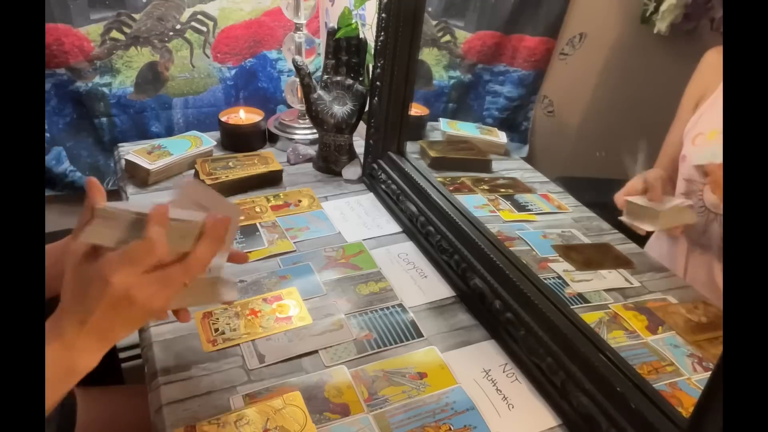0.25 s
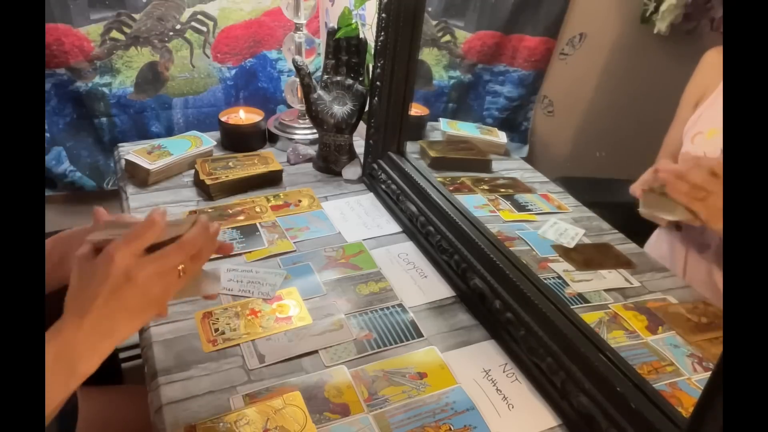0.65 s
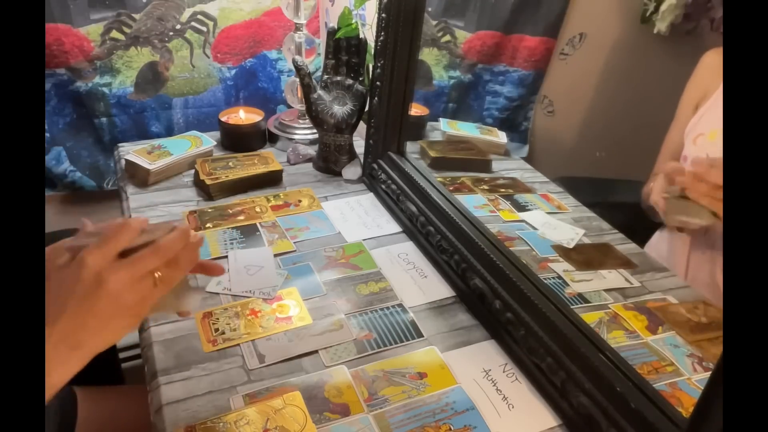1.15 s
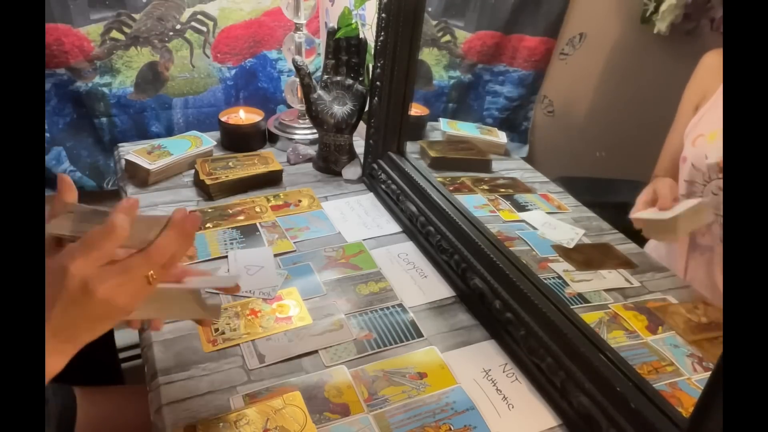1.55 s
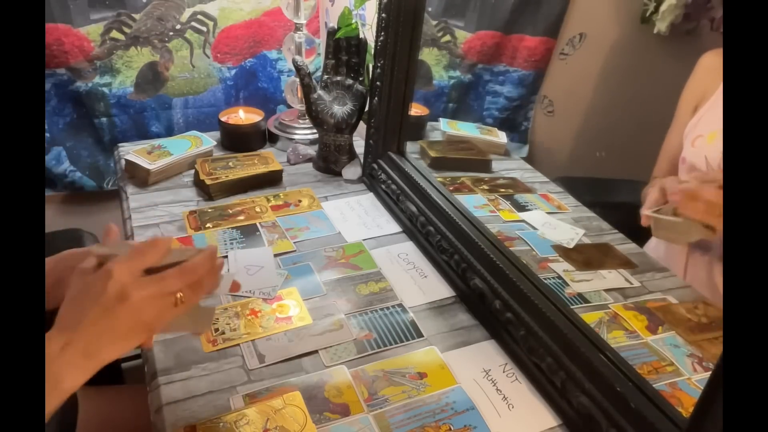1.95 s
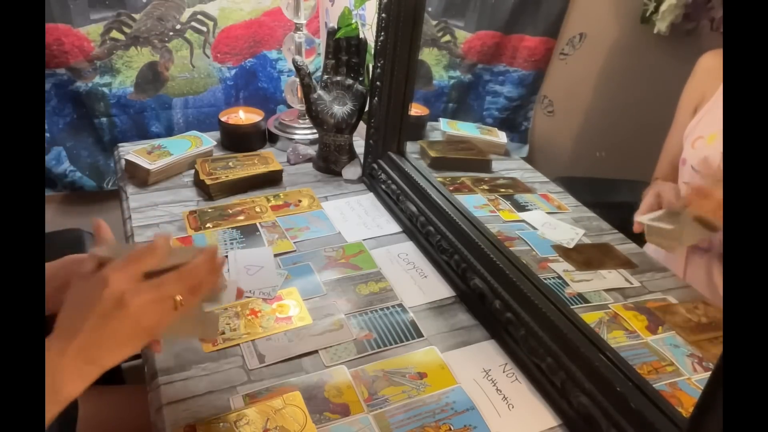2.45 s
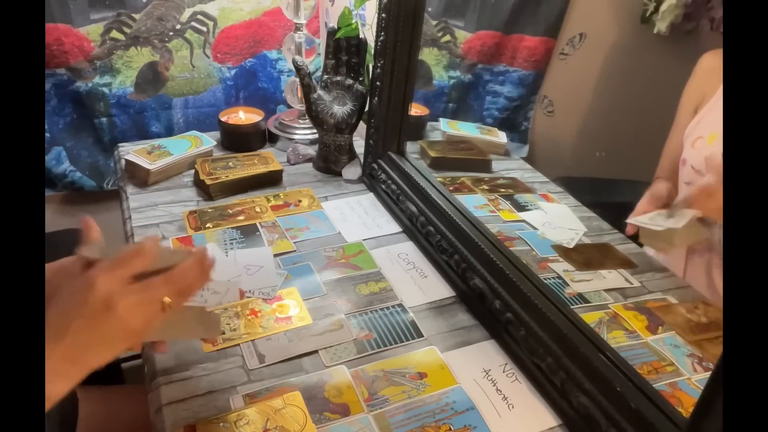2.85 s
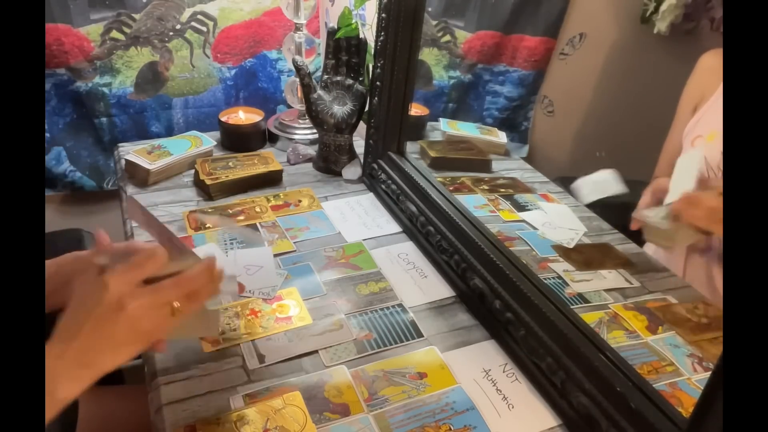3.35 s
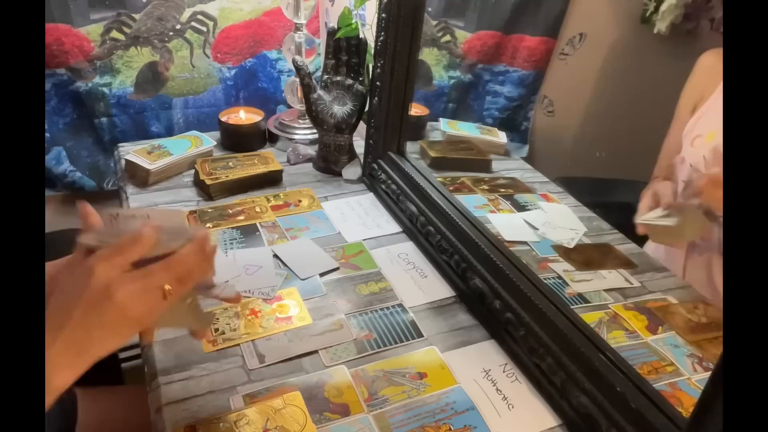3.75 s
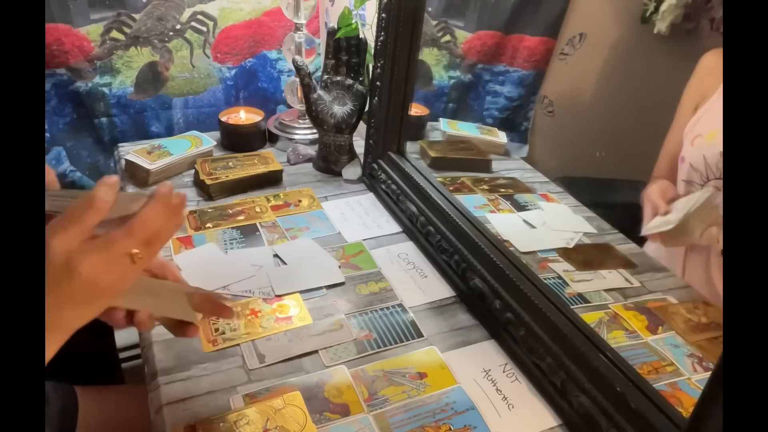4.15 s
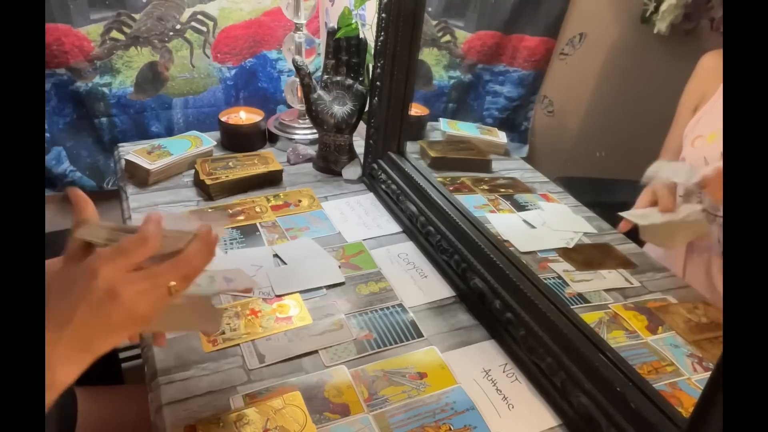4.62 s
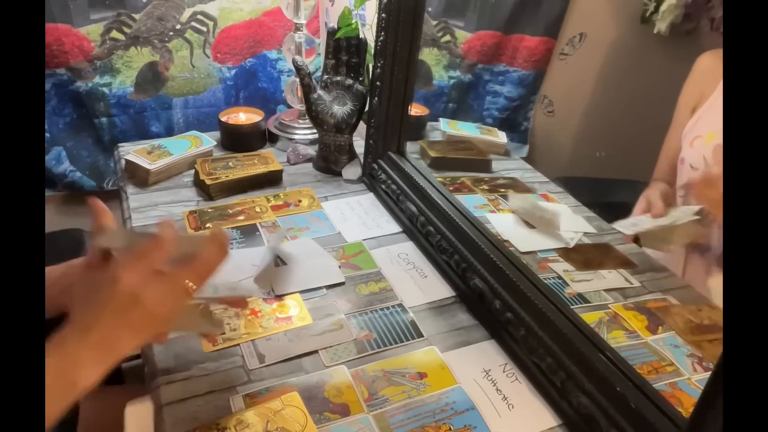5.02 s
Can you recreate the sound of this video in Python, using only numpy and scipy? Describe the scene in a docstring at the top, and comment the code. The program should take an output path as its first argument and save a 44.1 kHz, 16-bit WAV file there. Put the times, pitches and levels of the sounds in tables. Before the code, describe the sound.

Close stereo microphones in a small, quiet room pick up a deck of stiff cards being shuffled overhand. Each quick stroke is a soft finger tap, a gritty swelling hiss and a slap with a low puff of air. Single edges click between. Late on the slaps thin out, then resume, and the deck thuds softly into the palm.

```python
"""In a small room, above a table, a pair of nearby microphones hears stiff cards shuffled overhand.
Four to five strokes a second: a finger taps and lifts a packet, which opens a gap with a falling note,
its faces slide with a gritty hiss, and most strokes end in a slap onto the deck with a low puff of air.
Single edges flick past the fingers, and late on the slaps pause briefly. At the end the deck lands softly
in the palm, with a falling note of trapped air and a low ring. Very quiet room air lies under it all."""
import sys
import numpy as np
from scipy import signal
from scipy.fft import rfft, irfft, next_fast_len
from scipy.io import wavfile

SR = 44100
rng = np.random.default_rng(int(sys.argv[2]) if len(sys.argv) > 2 else 0)


def store_pcm(level_fs):
    """Save levels as 16-bit WAV."""
    pcm = np.round(np.clip(level_fs, -1, 1) * 32767).astype(np.int16)
    wavfile.write(sys.argv[1], SR, np.atleast_2d(pcm).T)


N = 232888
PRE = 4410  # samples of lead-in, cut off at the end of scene()
TIME = np.arange(-PRE, N) / SR  # seconds


def undb(db):
    """Decibels to gain."""
    return 10 ** (np.asarray(db) / 20)


def unit(x):
    """Scale to rms 1."""
    return x / np.sqrt(np.mean(x ** 2))


def blow(x):
    """Scale a short sound to the energy of 10 ms at rms 1."""
    return x * np.sqrt(.01 * SR / np.sum(x ** 2))


def along(hz, table, axis=1):
    """Read a column of a table on a log-frequency axis."""
    table = np.array(table, float)
    return np.interp(np.log(hz + 1), np.log(table[:, 0]), table[:, axis])


def colour(x, table):
    """Minimum-phase filter with the outline of a table of Hz and dB, built by folding the cepstrum."""
    n = 2 * next_fast_len(x.shape[-1] // 2 + 512)
    outline = undb(along(np.fft.rfftfreq(n, 1 / SR), table))
    cepstrum = irfft(np.log(outline))
    cepstrum[1:n // 2] *= 2
    cepstrum[n // 2 + 1:] = 0
    response = np.exp(rfft(cepstrum))
    return irfft(rfft(x, n) * response)[..., :x.shape[-1]]


def add(track, s, x):
    """Mix a sound into a track at time s in seconds."""
    i = max(0, int(s * SR) + PRE)
    x = x[..., :track.shape[-1] - i]
    track[..., i:i + x.shape[-1]] += x


def grit(n, spread_db):
    """Dense tiny collisions whose size changes at random every 8 samples."""
    sizes_db = spread_db * np.repeat(rng.standard_normal(n // 8 + 1), 8)[:n]
    return unit(rng.standard_normal(n) * undb(sizes_db))


def walk(n, rate):
    """Random wander with spread near 1, straight between knots that come at this rate per second."""
    knots = rng.standard_normal(1024)
    return np.interp(np.arange(n) / SR * rate, np.arange(len(knots)), knots)


# Edges of the body, middle, snap and fizz bands [Hz].
BAND_EDGES = np.array([250, 700, 2200, 6000, 14000])


def bands(x, band_db, bass_db):
    """Give white sound of level 0 dB these levels in the four bands; bass_db is the slope from body to bass."""
    density_db = np.array(band_db) - 10 * np.log10(np.diff(BAND_EDGES) / (SR / 2))
    centres = np.sqrt(BAND_EDGES[1:] * BAND_EDGES[:-1])
    bass = (140, density_db[0] + bass_db)
    return colour(x, np.vstack([bass, np.c_[centres, density_db]]))


# The still air of the room. Each row: frequency [Hz], relative density [dB per Hz].
STILL_AIR = [(30, -7.5), (120, -10.5), (300, -13.5), (1000, -21.5), (4000, -21), (14000, -30.5)]
QUIET_DB = -76.5  # level of the still air


def still_air():
    """Steady coloured noise, independent at the two microphones."""
    sides = [unit(colour(rng.standard_normal(len(TIME)), STILL_AIR)) for _ in range(2)]
    return undb(QUIET_DB) * np.array(sides)


# The two microphones. Each row: frequency [Hz], left minus right [dB], right later by [ms].
MICROPHONES = [(100, 1.5, .06), (400, 5, 0.029), (970, 7.5, 0.085), (1290, 2, 0.045), (2700, -5, 0.19),
               (3800, -4, 0.19), (5770, 5, 0.28), (7790, -1, 0.23), (11800, 0, 0.1638)]


def microphones(n):
    """Left and right response to the hands: the casing delays and shades each side differently."""
    hz = np.fft.rfftfreq(n, 1 / SR)
    balance_db, lag_s = along(hz, MICROPHONES), along(hz, MICROPHONES, axis=2) / 1000
    return np.array([undb(balance_db / 2), undb(-balance_db / 2) * np.exp(-2j * np.pi * hz * lag_s)])


# The room's echo. Each row: frequency [Hz], level [dB], likeness of left and right [0-1].
ROOM_ECHO = [(131, 2.5, 0.99), (310, -5.5, 0.94), (810, -1, 0.22), (1600, -5, 0.47), (4150, -3, 0.05),
             (8650, -5, 0.2), (12500, -9, 1)]
# The room's strongest standing wave: frequency [Hz], level [dB], T60 [s].
STANDING_WAVE = (130, -30, 0.32)
ROOM_T60_S = 0.26  # of the reflections


def echo(build_s, spread_db, size=15000):
    """The room's answer from one hand position: uneven reflections that fade fast, and a standing wave."""
    t, hz = np.arange(size) / SR, np.fft.rfftfreq(size, 1 / SR)
    fade = undb(-60 * t / ROOM_T60_S) * (1 - np.exp(-(t / build_s) ** 2))
    shared, *own = (rfft(grit(size, spread_db) * fade) / np.linalg.norm(fade) for _ in range(3))
    like = np.clip(along(hz, ROOM_ECHO, axis=2), 0, 1)
    mix = np.sqrt(like) * shared + np.sqrt(1 - like) * np.array(own)
    field = mix * undb(along(hz, ROOM_ECHO))
    reflections = irfft(field * microphones(size)) * (1 - (t / t[-1]) ** 2)  # tapers to silence
    mode_hz, mode_db, mode_t60 = STANDING_WAVE
    standing = np.sin(2 * np.pi * mode_hz * t) * undb(-60 * t / mode_t60)
    return reflections + undb(mode_db) * standing / np.linalg.norm(standing)


def room(x, size=4410):
    """Hands and cards keep moving, so each overlapping stretch meets a fresh pattern of reflections."""
    out, window = np.zeros((2, len(x))), signal.windows.cosine(2 * size)
    for i in range(0, len(x), size):
        piece = x[i:i + 2 * size]
        faded = piece * window[:len(piece)]
        add(out, TIME[i], signal.fftconvolve([faded], echo(build_s=0.0037, spread_db=4), axes=1))
    return out


# Colour of card stock. Each row: frequency [Hz], gain [dB].
CARD_COLOUR = [(40, -18.5), (130, -5.5), (280, -1), (520, -7.5), (1000, -4), (1400, -1.5), (1800, -2.5),
               (2200, 1.5), (2700, 1), (4200, -0.5), (6000, -0.5), (8300, -4), (11500, -0.5), (13800, -2.5),
               (14900, -3), (16000, -22.5)]


def card_stock(x):
    """Stiff card gives every touch, rub and slap the same overall colour."""
    return colour(x, CARD_COLOUR)


# Air resonances between packets and cupped hands. Each row: frequency [Hz], width [Hz], strength [dB].
HAND_HOLLOWS = [(570, 130, 0), (1600, 373, -3)]


def cupped(x, shift, pitch=1, ring_db=0):
    """The hollow of the hands rings with each contact, a little differently as the grip changes."""
    out = x
    for hz, width_hz, db in HAND_HOLLOWS:
        centre = pitch * hz * np.exp(shift * rng.standard_normal())
        peak = signal.iirpeak(centre, hz / width_hz, fs=SR)
        out = out + undb(db + ring_db) * signal.lfilter(*peak, x)
    return out


def contact(rise_s, fall_s, flutter_db, flutter_s, spread_db, size=2600):
    """Card edges hit almost together, then flutter as they settle; rows are direct sound and room feed."""
    t = np.arange(size) / SR
    decay = np.exp(-t / fall_s) + undb(flutter_db) * np.exp(-t / flutter_s)
    direct = grit(size, spread_db) * (1 - np.exp(-t / rise_s)) * decay
    # summed over all directions the collisions have an even spectrum, so the room hears one plain click
    click = signal.unit_impulse(size, int(fall_s * SR))
    return np.array([blow(direct), blow(click)])


# Colours of a flick and of a lifting finger: body, middle, snap, fizz [dB].
FLICK_TONE, LIFT_TONE = [-7, -1.5, -4.5, -11], [-5.5, -2, -7, -9.5]


def tick(db, tone, brightness=0, rise_s=0.0016, fall_s=0.002):
    """One light contact of a fingertip or a card edge; brightness tilts it around the middle band."""
    hit = contact(rise_s, fall_s, flutter_db=-12, flutter_s=0.011, spread_db=7.0)
    band_db = db + np.array(tone) + brightness * (np.arange(len(tone)) - 1)
    gains = undb([0, -1.5])[:, None]  # direct, room feed
    return gains * cupped(bands(hit, band_db, bass_db=-3.5), shift=0.091, pitch=0.99, ring_db=2.5)


# The air gap's second note: ratio to the first, level [dB].
GAP_OVERTONE = (2.4, -4.1)


def gap_note(end_hz, fall_ratio, glide_s, ring_s, overtone_db=0, size=3000):
    """The air gap under a packet is a hollow whose rough note falls as the packet moves; a steady note joins."""
    t = np.arange(size) / SR
    turns = np.cumsum(end_hz * (1 + (fall_ratio - 1) * np.exp(-t / glide_s))) / SR
    swell = t * np.exp(-t / ring_s) * (1 + 1.5 * walk(size, rate=500))
    ratio, db = GAP_OVERTONE
    wavering = np.sin(2 * np.pi * ratio * end_hz * t + .5 * walk(size, rate=280))
    second = wavering * np.exp(-t / ring_s)  # with the swell below, it dies sooner
    return blow(np.sin(2 * np.pi * turns) * swell) + undb(db + overtone_db) * blow(second * swell)


def snags(n, per_s, db, fall_s):
    """Now and then a card edge catches and lets go: brief swells on top of even friction."""
    catches = (rng.random(n) < per_s / SR) * rng.exponential(size=n)
    return 1 + undb(db) * signal.lfilter([1], [1, -np.exp(-1 / (fall_s * SR))], catches)


# Strokes of the hand, each lifting a packet and drawing it over the deck; levels are before the card colour.
# Each row: lift [s], end of slide [s], lift level [dB], note the air gap falls to [Hz],
# slide level at its start [dB], swell of the slide, a fade where negative [dB].
HAND_STROKES = [(0.106, 0.198, -46, 396, -56.5, 15), (0.3, 0.327, -47.5, 545, -68.5, 2),
                (0.343, .447, -47, 315, -57.5, 17), (0.616, 0.724, -46.5, 373, -58.5, 21),
                (0.847, 0.966, -46.5, 450, -58.5, 26), (1.134, 1.252, -48.5, 460, -61, 21.5),
                (1.408, 1.484, -38.5, 425, -57, 30), (1.666, 1.76, -44, 508, -54.5, 9.5),
                (1.908, 2.008, -39.5, 487, -52, 11.5), (2.15, 2.24, -45, 430, -59.5, 17),
                (2.384, 2.479, -41, 357, -57.5, 22), (2.625, 2.73, -49.5, 430, -57.5, 4),
                (2.885, 2.953, -50.5, 545, -59, -12), (3.126, 3.244, -42.5, 524.6, -57.5, 17),
                (3.3478, 3.512, -42.5, 464, -62.5, 20), (3.597, 3.784, -44.5, 432, -64.5, 25.5),
                (3.864, 3.987, -50.5, 396, -66.5, 2), (4.033, 4.116, -52, 490, -62.5, -3.5),
                (4.281, 4.33, -57.5, 402, -67, 9), (4.33, 4.387, -74, 413, -53.5, 3),
                (4.508, 4.609, -48, 414, -53, 13.5), (4.864, 4.918, -67, 483, -63, -7.5),
                (4.925, 4.971, -43, 246, -76, 3), (4.987, 5.05, -48, 284, -68, -1),
                (5.149, 5.183, -73, 510, -81, 9)]
# Colours of sliding faces and of the dull drag under them: body, middle, snap, fizz [dB].
SLIDE_TONE, DRAG_TONE = [-16, -9, 0.5, 1], [-3, -4, -6.5, -19.5]
SWELL_POWER = 4.6  # the swell follows this power of the way covered
DRAG_DB, DRAG_SHARE = -61.5, .35  # reference level, and the share of the slide's level changes followed


def slides(grip_db, grain_db, release_s):
    """Card faces rub: a dull drag, and fine hiss that catches and slips, mostly swelling along the way."""
    out, t = np.zeros(len(TIME)), np.arange(SR // 3) / SR
    for start, end, _, _, slide_db, swell_db in HAND_STROKES:
        length = max(end - start, release_s)
        way = np.minimum(t / length / 0.99, 1)
        db = slide_db + swell_db * way ** SWELL_POWER + grip_db * walk(len(t), rate=110)
        gate = np.clip(np.minimum(t, length + release_s - t) / release_s, 0, 1)
        friction = unit(grit(len(t), grain_db) * snags(len(t), per_s=55, db=7, fall_s=0.00084))
        hiss = bands(friction, SLIDE_TONE, bass_db=1.5) * undb(db)
        drag_db = DRAG_DB + DRAG_SHARE * (db - DRAG_DB)
        drag = cupped(bands(friction, DRAG_TONE, bass_db=3.5), shift=0.14) * undb(drag_db)
        add(out, start, (hiss + drag) * gate)
    return out


NOTE_DB = 1  # gap note relative to the lift's level


def lifts():
    """Each stroke begins with a finger's soft tap and the note of the gap opening under the packet."""
    out = np.zeros((2, len(TIME)))
    for s, _, db, note_hz, *_ in HAND_STROKES:
        add(out, s - .0018, tick(db, LIFT_TONE, rise_s=.004, fall_s=0.0023))
        note = gap_note(note_hz, fall_ratio=1.4, glide_s=.011, ring_s=0.009)
        add(out, s, undb(db + NOTE_DB) * note)
    return out


# Single card edges flicking past a finger; levels are before the card colour.
# Each row: time [s], level [dB], brightness [dB per band].
EDGE_FLICKS = [(.1449, -47, -1), (.222, -38.5, -6), (.3746, -34.5, 1), (0.659, -47, -1), (0.8049, -41, 4),
               (.8695, -33, 1.5), (.879, -40.5, 0), (1.087, -60.5, 8.5), (1.1996, -47.5, 2.5),
               (1.3324, -39, 1.5), (1.6985, -47.5, 0), (2.408, -34.5, 2.5), (2.493, -34.5, 1.5),
               (2.636, -46, 6.5), (2.988, -54.5, 17), (3.1325, -41.5, -3), (3.17, -58, 9),
               (3.2399, -35, -8.5), (3.359, -35.5, 1.5), (3.3841, -39, 0), (3.4157, -32.5, 2),
               (3.4822, -42.5, 2.5), (3.652, -36.5, 3), (3.6766, -38.5, 4.5), (3.783, -35.5, -2),
               (3.9512, -48.5, -1.5), (4.078, -54.5, 5.5), (4.524, -43, 0), (4.699, -45.5, 1.5),
               (4.709, -41, -1.5), (4.8655, -42, 0.5), (4.927, -48.5, 7.5), (4.9885, -67, 12.5),
               (5.041, -76, 19.5), (5.093, -62.5, -7)]
STRAY_COUNT = 2  # stray ticks in each slide
STRAY_DB, STRAY_SPREAD_DB = -2, 5.5  # mean level relative to the slide's start, and its scatter


def touches():
    """Single edges flick past the fingers, and faint stray ones tick at random while a packet moves."""
    out = np.zeros((2, len(TIME)))
    for s, db, brightness in EDGE_FLICKS:
        add(out, s - .0008, tick(db, FLICK_TONE, brightness))
    for start, end, _, _, slide_db, _ in HAND_STROKES:
        for place, size in zip(rng.random(STRAY_COUNT), rng.standard_normal(STRAY_COUNT)):
            stray_db = slide_db + STRAY_DB + STRAY_SPREAD_DB * size
            add(out, start + place * (end - start), tick(stray_db, FLICK_TONE))
    return out


# The deck settling in the palm.
# Each row: time [s], level [dB], level of the trapped air [dB], note that air falls to [Hz].
PALM_LANDINGS = [(5.1931, -25.5, -38, 390)]
# What hand and deck ring with. Each row: frequency [Hz], relative level [dB], T60 [s].
HAND_AND_DECK_MODES = [(79.3, -14, 0.107), (128, 17.5, 0.07), (148, -8, 0.054), (192, -9, 0.092),
                       (284, -20, 0.16), (370, -16, 0.1), (458, -27, 0.13), (624, -5, .06)]
PALM_ROOM_DB = -20  # the palm thud's feed to the room


def palm(push_s, size=6000):
    """Trapped air escapes with a falling note; the soft palm pushes slowly, so low modes ring up gradually."""
    out, t = np.zeros(len(TIME)), np.arange(size) / SR
    ring = sum(undb(db - 60 * t / t60) * np.sin(2 * np.pi * hz * t) for hz, db, t60 in HAND_AND_DECK_MODES)
    push = 1 - np.exp(-(t / push_s) ** 2)
    for s, db, air_db, note_hz in PALM_LANDINGS:
        note = gap_note(note_hz, fall_ratio=1.62, glide_s=0.015, ring_s=0.007, overtone_db=-20)
        touch = tick(db - 27.5, LIFT_TONE, brightness=-2, rise_s=0.0037, fall_s=.006)[0]  # direct row only
        add(out, s - .009, undb(air_db) * note)
        add(out, s - .009, touch)
        add(out, s, undb(db) * blow(ring * push))
    return out


def puff(hz, width_s, size=1500):
    """Air squeezed from between two packets: a few low swings."""
    t = np.arange(size) / SR - 2 * width_s
    return blow(-np.cos(2 * np.pi * hz * t) * np.exp(-(t / width_s) ** 2))


# Packets and cards landing on the deck; levels are before the card colour.
# Each row: time [s], level [dB], air puff level [dB], snap and fizz relative to the level [dB],
# first contact earlier by [ms], pitch of the hands' hollow before its scatter [ratio].
LANDINGS = [(-.016, -31.5, -32.5, 5.5, -4.5, 1.04, 1.04), (0.207, -27, -36, -14, -13.5, 4.2, 1.17),
            (0.4504, -29.5, -26, 4.5, 1.5, 3.8, 0.56), (0.7293, -29, -32.5, -7, -18.5, 2.37, 0.89),
            (0.9591, -27.5, -27.5, 5, 1, 4.8, 0.86), (1.257, -32.5, -32, -3, -2.5, 2.78, 1.2),
            (1.363, -27, -32.5, 1, -5, 6, 0.99), (1.3807, -27, -49, 4, -0.5, 1.45, 0.71),
            (1.483, -23.5, -29.5, 1.5, -35, 7.26, 0.95), (1.7656, -29, -28.5, 3.5, -3.5, 3.9, 0.7),
            (2.0032, -26, -28.5, 6, -8.5, 5.43, 0.61), (2.2527, -23, -29.5, -6.5, -8, 4.85, 0.93),
            (2.4818, -29.5, -31.5, -2, 3, 3.9, 1.07), (2.745, -29.5, -34.5, 1.5, -4.5, 10.3, 0.74),
            (2.9099, -30.5, -51, 3, 6.5, .6, 0.82), (2.978, -26, -29, -2, 3.5, 4.5, .63),
            (3.519, -29, -46, 2, -4.5, 3.97, 0.67), (3.5253, -30.5, -49, 0.5, 4.5, 1.48, 0.57),
            (3.6406, -26, -66, -5.5, -15, 4.8, 0.88), (3.7768, -35, -40.5, 2.5, -4, 0.6, 1.34),
            (4.3893, -31.5, -28.5, 2, 5.5, 6, 0.57), (4.61, -30, -31.5, -5, -18, 3, 1.11),
            (4.7233, -21.5, -43, 3, -7, 4.18, 0.64)]
SLAP_BODY_DB, CORNER_DB, SLAP_ROOM_DB = -2.5, -5, -1.93  # body band, leading corner, feed to the room
PUFF_HZ, PUFF_SCATTER = 152, .12  # middle note of the puff, and its scatter as a share


def slaps():
    """A corner touches first and scrapes, then the packet lands flat and pushes out a puff of air."""
    out, gains = np.zeros((2, len(TIME))), undb([0, SLAP_ROOM_DB])[:, None]
    for s, db, puff_db, snap, fizz, lead_ms, pitch in LANDINGS:
        tone = db + np.array([SLAP_BODY_DB, 0, snap, fizz])
        # a card that lands nearly square, with little corner lead, makes a shorter snap
        slant = np.clip(lead_ms, .25, 1)
        scrape = contact(rise_s=0.0018, fall_s=0.0033, flutter_db=-7.5, flutter_s=0.0048, spread_db=1.5)[0]
        corner = cupped(bands(scrape, tone + CORNER_DB, bass_db=-12), shift=0.39)
        hit = contact(rise_s=0.0012 * slant ** 2, fall_s=.0018 * slant,
                      flutter_db=-12, flutter_s=0.0075 * slant, spread_db=1.0)
        flat = cupped(bands(hit, tone, bass_db=-10.0), shift=0.022, pitch=pitch)
        puff_hz = PUFF_HZ * np.exp(PUFF_SCATTER * rng.standard_normal())
        air = undb(puff_db) * puff(puff_hz, width_s=0.0039)
        add(out, s - lead_ms / 1000, slant ** 2 * gains * corner)
        add(out, s - .0009, gains * flat)
        add(out, s - .0033, undb([0, -9])[:, None] * air)
    return out


def scene():
    """All card sounds share one colour and, with the palm's thud, one room, over very quiet air."""
    rubbing = slides(grip_db=0.5, grain_db=1.5, release_s=0.0022)
    near, far = card_stock(slaps() + lifts() + touches() + rubbing)  # direct sound, room feed
    thud = palm(push_s=0.023)
    direct = irfft(rfft(near + thud) * microphones(len(TIME)), len(TIME))
    reflected = room(far + undb(PALM_ROOM_DB) * thud)
    return (direct + reflected + still_air())[:, PRE:]


LOW_CUT_HZ, TOP_HZ = 40, 16400


def record(dry):
    """The recorder thins the deepest bass and cuts the top."""
    thin = signal.sosfilt(signal.butter(2, LOW_CUT_HZ, "high", fs=SR, output="sos"), dry)
    return signal.sosfilt(signal.ellip(8, .2, 70, TOP_HZ, fs=SR, output="sos"), thin)


dry = scene()
out = record(dry)
store_pcm(out)
```